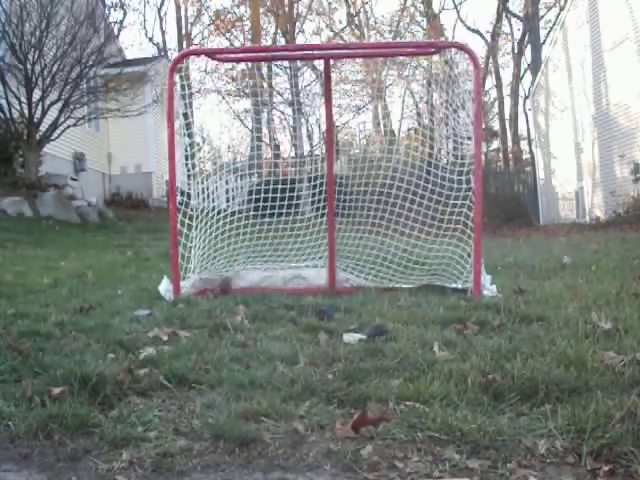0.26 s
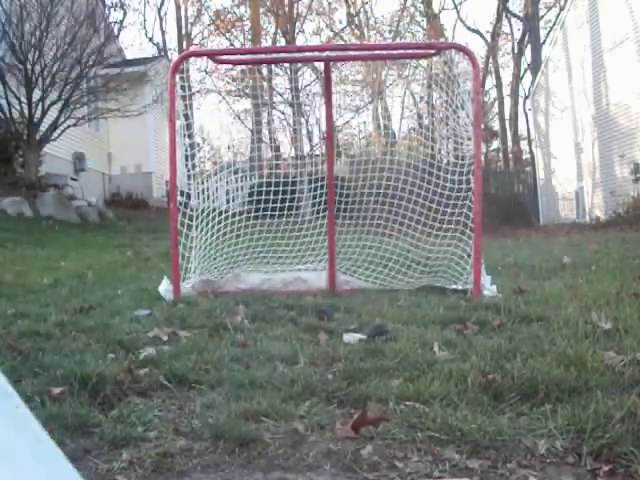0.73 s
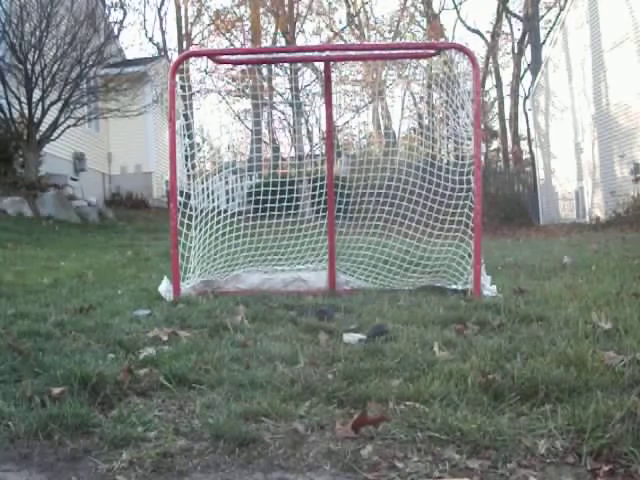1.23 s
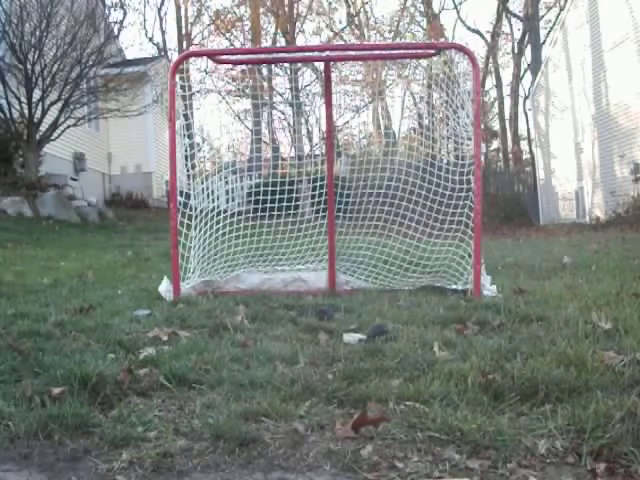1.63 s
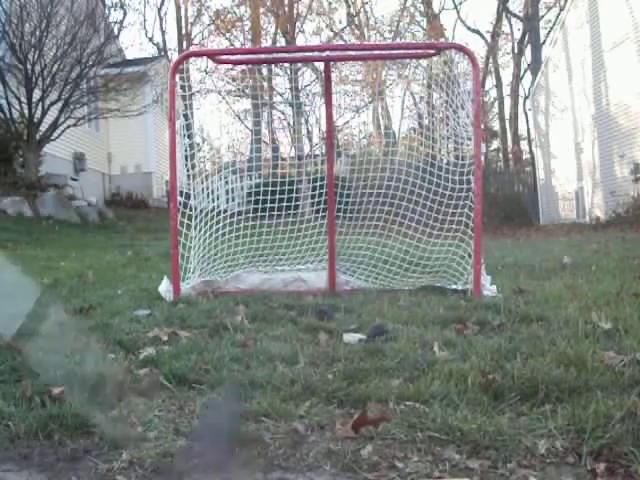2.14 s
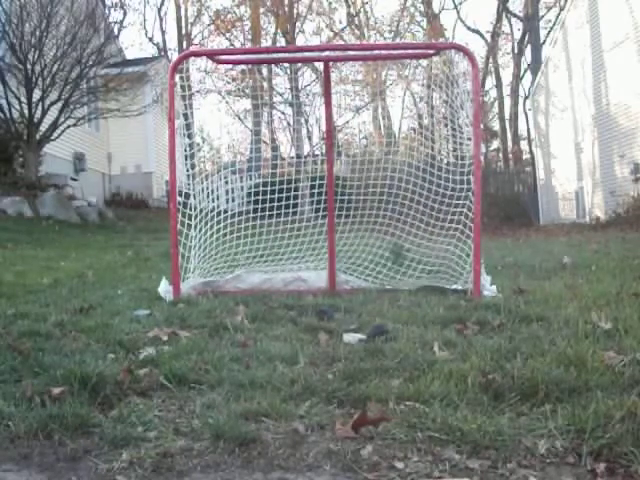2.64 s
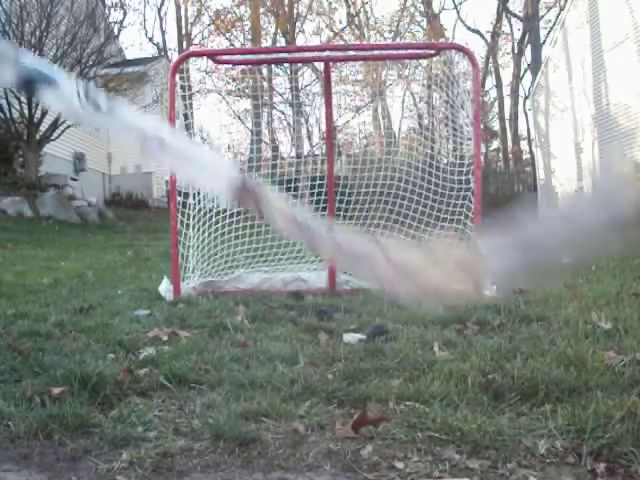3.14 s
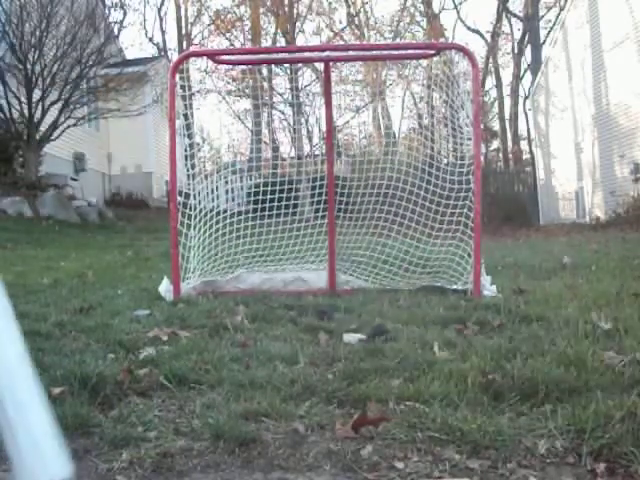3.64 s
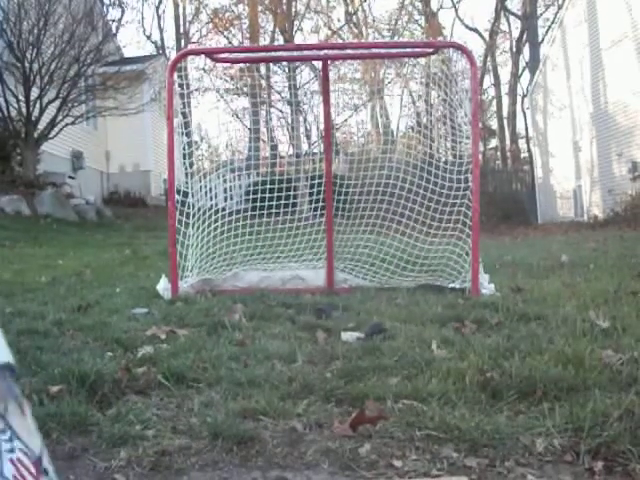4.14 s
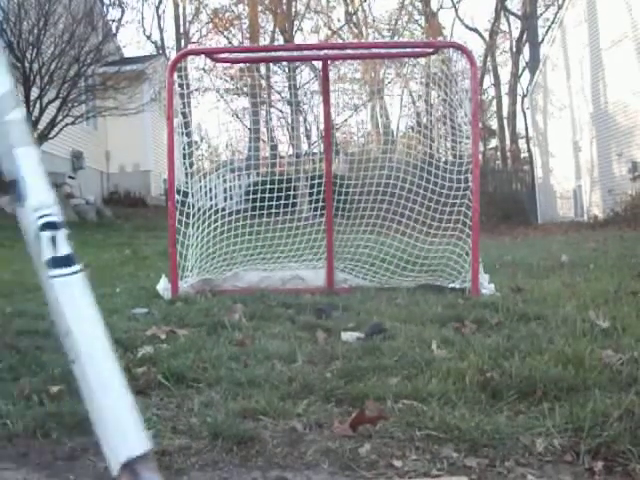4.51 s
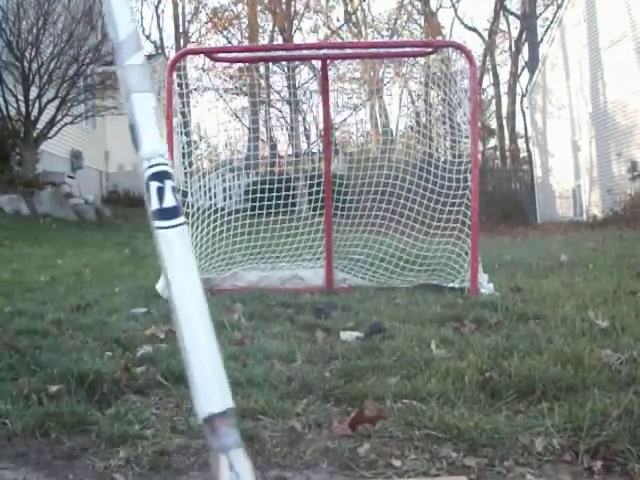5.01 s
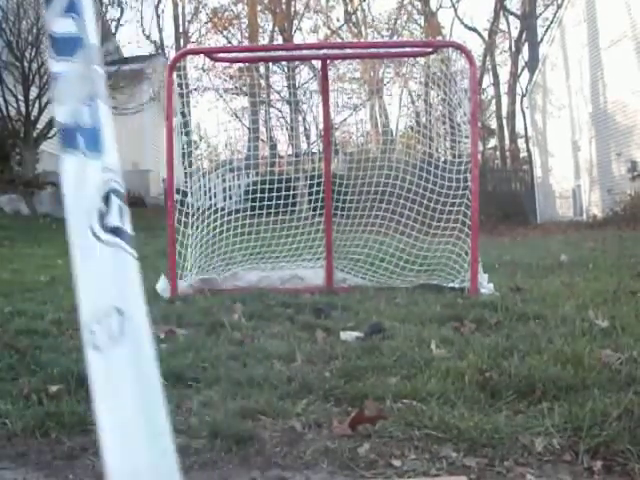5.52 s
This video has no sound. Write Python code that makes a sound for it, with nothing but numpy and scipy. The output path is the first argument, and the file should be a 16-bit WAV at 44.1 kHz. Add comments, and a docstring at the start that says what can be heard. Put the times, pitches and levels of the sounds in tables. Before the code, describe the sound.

In a quiet backyard, a hockey stick knocks and drags pucks on a board. Sharp clacks come in clusters around one and two seconds, then a near pause, a violent cracking shot just before four seconds with a short ringing shaft, and finally scattered hollow taps and scrapes. Close, dull small-camera microphone with faint hiss, whine and clipped peaks.

```python
"""A hockey stick taps, drags and shoots rubber pucks on a board laid on a lawn: each blow or rub rings shared modes.
Slaps crack, grit snaps, the shaft rings on after hard blows; low thuds and soft noisy swishes fall between.
Fences and house walls return a thin tail; light wind and far suburb hiss lie beneath, as shaped noise.
The microphone is a small camera's: dull above about 5.6 kHz, faintly whining, turned down after loud blows,
with a hard ceiling on the loudest."""
import sys
import numpy as np
from scipy import signal
from scipy.io import wavfile
from scipy.ndimage import uniform_filter1d

SR = 44100
rng = np.random.default_rng(int(sys.argv[2]) if len(sys.argv) > 2 else 0)


def generate_wav(sig):
    """Save sig (samples, or channels by samples) to the path in sys.argv[1] as 16-bit PCM at SR."""
    pcm = np.round(np.clip(np.atleast_2d(sig).T, -1, 1) * 32767).astype(np.int16)
    wavfile.write(sys.argv[1], SR, pcm)


N = 254456  # samples


def amp(db):
    """Amplitude factor of a level in dB."""
    return 10 ** (np.asarray(db) / 20)


def evened(x):
    """Scale a sound to rms 1."""
    return x / np.sqrt(np.mean(x ** 2) + 1e-20)


def read(points, hz):
    """Read a curve of (Hz, value) along a logarithmic pitch axis."""
    f, value = np.transpose(points)
    return np.interp(np.log(hz + 1), np.log(f + 1), value)


def add(mix, s, sound):
    """Lay a sound into the mix from s seconds on."""
    part = mix[round(s * SR):][:len(sound)]
    part += sound[:len(part)]


def wander(size, span):
    """Slow chance of rms 1 that changes over span samples."""
    noise = rng.standard_normal(size)
    return evened(uniform_filter1d(uniform_filter1d(noise, span), span))


def ring(hz, db, t60, size=6000):
    """Sum of dying sines; neighbours alternate in sign so the valleys stay filled."""
    t = np.arange(size) / SR
    sign = (-1.) ** np.arange(len(hz))
    decay = amp(db[:, None] - 60 * t / t60[:, None])
    return sign @ (decay * np.sin(2 * np.pi * hz[:, None] * t))


# Modes of board and blade, in four groups from low to high; blows and strokes both play them.
# Each row: pitch in Hz, t60 in seconds before damping, then relative level in dB when struck,
# under a sliding puck, under a sweep and under a drag.
MODES_BOOM = [(186, 0.16, -12, -22, -4.5, -11), (240.3, 0.22, -5, -3.5, -5.5, 23.5),
              (300.3, 0.17, -3, -1.5, -1.5, -15), (341.2, 0.16, -6.5, -4.5, -4, -2)]
MODES_KNOCK = [(463.6, 0.14, 1.5, -10, -7, 7), (521, 0.13, 1, -7, -1.5, 7), (637, 0.098, 6, 0, -1, 3),
               (692.5, 0.12, 3.5, 2, -0.5, 4), (802, 0.066, 6, -5.5, 4, 4),
               (955.6, .12, -2.5, -10.5, -6.5, -4), (1031, 0.053, 3.5, -35, 0, -2.5),
               (1122, 0.084, -0.5, -1, -6.5, -30)]
MODES_CLACK = [(1264, 0.021, 2, -2, 4.5, -5.5), (1448, 0.054, -3.5, 2.5, -19, -10.5),
               (1597, 0.039, -3.5, -3, 0, -11), (1766, 0.071, -11, 3.5, -40, -7.5),
               (1855, 0.063, -10, 7, -16.5, -12), (2045, 0.014, 4, 9.5, 3.5, -9.5),
               (2310, 0.026, -6, -3, -3, -13), (2263, 0.065, -11, -4.5, -0.5, -13.5),
               (2620, 0.0091, -6, 5.5, -4, -11), (2904, 0.035, -11, -2.5, -12, -14)]
MODES_TICK = [(3135, 0.019, 0, 7.9, -0.36, 4.5), (3540, 0.01, 4, 11.7, 4.1, 8),
              (3956, 0.011, 1.5, 3.8, -1.5, -8), (4570, 0.0063, 3, 11.6, 0.65, 1),
              (5070, 0.0033, -11.5, 8.5, 0, 8.5)]
BODY = [MODES_BOOM, MODES_KNOCK, MODES_CLACK, MODES_TICK]
# Blows on the board. Each row: start in seconds, knock level in dB before a common trim, boom in dB
# re knock, clack (brightness) in dB re knock, centre of the knock in Hz, damping factor.
BLOWS = [(0.568, -34, -34, -0.5, 476, 2.1), (0.606, -42.5, -5, -6, 685, 2.4),
         (0.705, -35.5, 11, 0, 756, 5.5), (0.884, -12, -9, -5.5, 695, 0.32),
         (0.919, -17.5, -9, -11, 781, 1.4), (1.038, -12, -17.5, -4.5, 1160, 0.76),
         (1.06, -25.5, -9, -6, 633, 1), (1.261, -22.5, -10, 1.5, 694, 0.99),
         (1.567, -24, -13, -7, 660, 1.1), (1.68, -22, -25, -3, 687, 0.5),
         (1.962, -12.5, -5, -9.5, 800, 0.94), (1.97, -13.5, -14, -27, 660, 0.69),
         (2.003, -10, -20, -9, 950, 0.78), (2.109, -10.5, -17, -6.5, 930, 1.05),
         (2.129, -13, -22, -5.5, 641, 0.81), (2.165, -16, -17, -4.5, 460, .79),
         (2.198, -17.5, -22, -33, 470, 0.72), (2.225, -25.5, -25, -31, 496, 0.77),
         (2.392, -17.5, -7.5, 5.5, 840, 2.8), (3.054, -32, -25, 0.5, 1030, 1.14),
         (3.483, -39, -30, -21, 856, 2.5), (3.623, -43.5, -25, -1, 487, 3.8),
         (3.738, -21.5, 6, 7.5, 780, 0.33), (3.772, -17, -3.5, 8, 1110, 1.37),
         (3.784, -12.5, -13.5, -3.5, 630, .64), (3.811, -15, -27, 11, 616, 0.46),
         (3.853, -15, -8, 4.5, 1100, 0.79), (3.883, -17, 0, 3.5, 452, 0.25),
         (4.155, -22.5, -1, -14, 540, 2.7), (4.55, -14.5, -12.5, -24.5, 647, 0.69),
         (4.611, -31, -11.5, -33.5, 510, 1.9), (4.776, -20, 5.5, -1, 966, 0.47),
         (4.787, -19, -1, -5.5, 575, 0.28), (4.809, -28.5, 7.5, -16, 446, 0.35),
         (4.905, -14, -13.5, -30, 684, 0.64), (5.036, -27, -12, -12.5, 466, 1.3),
         (5.269, -29.5, -16, -28, 770, 0.36), (5.326, -33, -29, -21, 643, 0.59),
         (5.354, -30.5, -3.5, -37, 662, 1), (5.589, -15.5, -21, -13, 743, 1.7),
         (5.607, -26, -30, -10.5, 634, 0.53), (5.665, -33.5, 10, -11, 625, 0.64),
         (5.714, -25, -14, -22, 543, 0.23), (5.751, -12.5, -16, -20.5, 643, 0.6)]
# How long the rattle lasts in boom, knock, clack and tick: a factor on the contact time each.
RATTLE_LASTING = [1.45, 1.35, 1.77, 2.4]
CONTACT_MS = 5.8  # decay time of the rattle before its factors
LONGER_PER_DB = 0.03  # octaves of contact time per clack dB: a bright, flat slap rattles longer
TICK_DB, TICK_PER_CLACK = -13, 1.98  # a brighter blow gains still more in the highest modes


def blow(knock_db, boom_db, clack_db, knock_hz, damping):
    """A first knock and a dying rattle ring the modes; the spot struck favours those near knock_hz."""
    t_ms = np.arange(2000) / SR * 1000
    grit = rng.standard_normal(2000)
    tick_db = TICK_DB + TICK_PER_CLACK * clack_db
    group_db = knock_db + np.array([boom_db, 0, clack_db, tick_db])
    out = 0
    for modes, db, lasting in zip(BODY, group_db, RATTLE_LASTING):
        contact_ms = max(CONTACT_MS * 2 ** (LONGER_PER_DB * clack_db) * lasting, .3)
        rattle = (1 - np.exp(-t_ms / 0.52)) * np.exp(-t_ms / contact_ms) * grit
        rattle[20] += 16.  # first contact
        hz, t60, mode_db = np.transpose(modes)[:3]
        if modes is MODES_KNOCK:
            spot_db = -14 * np.log2(hz / knock_hz) ** 2
        else:
            spot_db = 0.99 * rng.standard_normal(len(hz))
        damped_t60 = 0.42 * t60 / max(damping, .1)
        sound = signal.fftconvolve(rattle, ring(hz, mode_db + spot_db, damped_t60))
        peak = np.sqrt(abs(uniform_filter1d(sound ** 2, size=250)).max())  # loudest 6 ms, rms
        out = out + amp(db - 2.5) * sound / peak
    return out


# Puck and blade sliding on the board, one curve a stroke.
# Each row of a curve: time in seconds, knock level in dB (how hard they rub).
SLIDES = [
    [(0.97, -71), (1.014, -37), (1.032, -23)],
    [(1.07, -40.5), (1.134, -48.5), (1.188, -40.5), (1.256, -34.5)],
    [(1.28, -28.5), (1.322, -43), (1.42, -35), (1.504, -38.5), (1.558, -35), (1.654, -40.5), (1.694, -31),
     (1.858, -34.5), (1.9, -62)],
    [(1.9, -52), (1.96, -27)],
    [(2.02, -28), (2.042, -39), (2.098, -23), (2.12, -18), (2.19, -25), (2.234, -34.5), (2.3, -76)],
    [(2.405, -42), (2.453, -53), (2.521, -45.5), (2.531, -67), (2.62, -66)],
    [(3.79, -40), (3.81, -14)],
    [(3.825, -42), (3.86, -22.5), (3.89, -34), (3.93, -56), (4.04, -80)],
    [(4.165, -36), (4.189, -38), (4.201, -30), (4.267, -65)],
    [(4.8, -26), (4.816, -29), (4.878, -58), (4.9, -56)],
    [(4.925, -41.5), (4.981, -62.5), (5.039, -35), (5.071, -48), (5.267, -35.5), (5.367, -44),
     (5.45, -47.5)],
    [(5.45, -52), (5.554, -43.5), (5.575, -26), (5.62, -29), (5.652, -40.5), (5.686, -44), (5.745, -41)],
]
# One entry a stroke: 0 for a sliding puck, 1 for a sweep, 2 for a drag.
CONTACT = [1, 1, 0, 0, 1, 1, 1, 1, 2, 2, 2, 1]
# The same strokes. Each row: damping factor of the pressed blade, then boom, clack and tick levels
# in dB when the knock is at MEDIUM_DB.
STROKES = [(2.7, -42, -43, -53), (1.4, -49, -43.5, -58), (0.73, -56, -48.5, -58), (2.5, -60, -42, -51),
           (1.3, -44.5, -44.5, -56.5), (1.2, -46.5, -39, -49), (5.8, -38, -31, -49),
           (2.6, -30, -36.5, -43.5), (2.8, -40, -73, -61.5), (8, -31, -69, -59), (1.56, -45, -54.5, -62.5),
           (1.85, -47, -50, -58)]
# Share of the knock's swings in dB that boom, clack and tick follow.
FOLLOW = [0.56, 0.53, 0.29]
MEDIUM_DB = -40


def slide(rows, contact, pressure, *medium_db):
    """Rough rubber on board: dense small slips, coming in clumps, keep the modes ringing."""
    s, knock_db = np.transpose(rows)
    swings_db = np.outer(FOLLOW, knock_db - MEDIUM_DB)
    boom_db, clack_db, tick_db = swings_db + np.array(medium_db)[:, None]
    t = np.arange(s[0] - .05, s[-1], 1 / SR)  # a lead-in lets the modes fill up
    size = len(t)
    clumps = amp(0.92 * wander(SR, span=500)[:size] + 2.9 * wander(SR, span=60)[:size])
    out = 0
    for modes, db in zip(BODY, [boom_db, knock_db, clack_db, tick_db]):
        table = np.transpose(modes)
        slips = rng.standard_normal(SR)[:size] * clumps
        ringing = ring(table[0], table[3 + contact], table[1] / max(pressure, .3))
        sound = signal.fftconvolve(slips, ringing)[:size]
        out = out + amp(np.interp(t, s, db)) * evened(sound)
    to_edge = np.minimum(t - s[0], s[-1] - t)
    return t[0], out * np.clip(to_edge / 0.0031 + .5, 0, 1)  # 3.1 ms fades


def snap(peak_db, *shape):
    """A burst so short that its peak sets the level."""
    burst = swish(0, *shape)
    return amp(peak_db) * burst / abs(burst).max()


# Dense cracks of the blade slapped flat, at or near the onset of blows.
# Each row: start in seconds, peak in dB, length in ms, centre in Hz, half width in octaves.
CRACKS = [(0.8843, -5, 2.3, 2480, 0.52), (1.039, 0.4, 5.57, 1446, 0.4), (1.262, -14.5, 1.8, 1940, 0.41),
          (1.9635, -1.3, 1.8, 1440, .86), (2.3926, -.3, 4.6, 2400, 1.1), (1.999, -16.5, 2.7, 1770, 0.38),
          (3.771, -2, 6.2, 1970, 0.65), (3.8125, 2.5, 6, 2135, 1), (4.155, -21, 2.4, 1175, 0.28),
          (4.779, -18, 12, 2720, 0.42), (5.715, -21.5, 2.9, 1700, 0.19)]


def crack(peak_db, ms, hz, octaves):
    """The slap of the flat blade is a dense band of noise, a few milliseconds long."""
    return snap(peak_db, ms, hz, octaves)


# Grit under blade or puck. Each row: start in seconds, peak in dB.
TICKS = [(0.814, -35.5), (1.1336, -36), (1.5628, -29), (2.167, -27), (2.229, -36), (2.2472, -27),
         (2.2674, -40), (2.31, -27.5), (3.431, -36.5), (3.463, -35), (4.406, -42.5), (4.553, -41.5),
         (4.9028, -35.5), (5.033, -37.5)]


def grit_tick(peak_db):
    """A grain of grit snaps: one very short burst at a broad high pitch."""
    return snap(peak_db, 3.6, 2850, 1)  # ms, Hz, half width in octaves


# Modes of the shaft. Each row: pitch in Hz, relative level in dB, t60 in seconds.
SHAFT = [(296, 0, .36), (449, -9, .22), (581, -9, .33), (1044, -11, .4), (1685, -9, .55), (1890, -12, .5),
         (2579, -21, .45), (3435, -25, .35)]
# Blows that set the shaft ringing. Each row: start in seconds, level in dB.
SHAFT_BLOWS = [(3.811, -16.5), (4.776, -47)]


def shaft(db):
    """The shaft rings on after a hard blow, in long modes of its own."""
    return amp(db) * ring(*np.transpose(SHAFT), size=SR // 2)


# Low thuds, some of them the deep boom under a hard blow.
# Each row: start in seconds, level in dB before a common trim, settled pitch in Hz, t60 in seconds.
THUDS = [(0.105, -25.5, 101.5, 0.17), (0.149, -17, 93, 0.035), (2.254, -25.5, 57, 0.13),
         (2.624, -25, 113, 0.028), (2.751, -20.5, 63.5, 0.052), (3.74, -6, 238, 0.066),
         (4.778, -18, 120.5, 0.13), (4.827, -28, 198, 0.049)]


def thud(db, hz, t60):
    """A soft push: a few low cycles that sink in pitch."""
    t = np.arange(8000) / SR
    turns = hz * (t + 0.0036 * (1 - np.exp(-t / 0.00067)))
    onset = 1 - np.exp(-t / 0.00071)
    return amp(db + 1.5 - 60 * t / t60) * np.sin(2 * np.pi * turns) * onset


# Soft bursts of noise around one pitch: swishes, a breath-like swell, the ring and echo after the shot.
# Each row: start in seconds, rms in dB before the taper, length in ms, centre in Hz, half width in octaves.
SWISHES = [(0.144, -27, 31.3, 1550, 0.8), (.985, -46.5, 49, 2940, 0.34), (2.408, -42.5, 86, 2160, 0.11),
           (2.576, -40, 11.3, 1930, 0.2), (2.706, -53, 12, 2960, 0.22), (3.027, -39.5, 7.2, 1770, 0.46),
           (3.041, -37.5, 18, 1640, 0.6), (3.454, -48, 21, 3020, 0.17), (3.588, -57.5, 19.7, 2500, 1.2),
           (4.039, -48.5, 30, 3500, 0.54), (4.3, -50.5, 120, 1400, 0.31), (4.38, -43, 87, 1390, 0.27)]


def swish(db, ms, hz, octaves):
    """A short crackly burst of noise around one pitch, tapered at both ends; snaps use it too."""
    size = round(ms * SR / 1000)
    crackle = amp(1.1 * wander(9000, span=30)[:size])
    grains = rng.standard_normal(9000)[:size] * crackle
    edges_hz = np.clip(hz * 2. ** np.array([-octaves, octaves]), 50, 9000)
    band = signal.butter(2, edges_hz, "band", fs=SR)
    return amp(db) * evened(signal.lfilter(*band, grains)) * signal.windows.tukey(size, .3)


# Tail of the yard. Each row: pitch in Hz, t60 in seconds.
YARD = [(100, 0.45), (500, 1), (2000, 0.8), (5000, 0.29)]


def yard(x):
    """Fences and house walls send back a thin tail after about 12 ms, dying by band."""
    hz, t, z = signal.stft(rng.standard_normal(SR // 2), SR, nperseg=256)
    decay = amp(-60 * t / read(YARD, hz)[:, None])
    tail = signal.istft(z * decay * (t > .012), SR, nperseg=256)[1]
    return signal.fftconvolve(x, tail / np.linalg.norm(tail))[:N]


def shaped(colour, size, patchy_db):
    """Noise of a given spectrum whose level drifts in patches of time and pitch."""
    frames, hz = N // (size // 4) + 5, np.fft.rfftfreq(size, 1 / SR)
    a, b, patches = rng.standard_normal((frames, len(hz), 3)).T
    patches = uniform_filter1d(patches, size=12, axis=0)  # across pitch
    patches = evened(uniform_filter1d(patches, size=10, axis=1))  # across time
    z = (a + 1j * b) * amp(read(colour, hz)[:, None] + patchy_db * patches)
    return evened(signal.istft(z, nperseg=size, noverlap=size - size // 4)[1][:N])


# Gusts at the microphone. Each row: time in seconds, level in dB before a small random drift.
WIND = [(0.0, -49), (0.67, -46), (0.8, -46), (1.67, -48.5), (2.15, -43.5), (3.41, -49), (3.68, -46.5),
        (3.94, -40.5), (4.68, -50.5), (4.93, -40), (5.45, -47), (5.77, -45)]
# Spectrum of the wind. Each row: pitch in Hz, relative level in dB.
WIND_COLOUR = [(10, -30.5), (25, -1.5), (50, -6), (90, -9), (150, -17), (300, -27.5), (500, -71.5)]


def wind():
    """Lumpy wind on the microphone: low noise swelling and sinking with the gusts."""
    t = np.arange(N) / SR
    gusts_db = np.interp(t, *np.transpose(WIND)) + 1.5 * wander(N, span=2000)
    return amp(gusts_db) * shaped(WIND_COLOUR, size=4096, patchy_db=0.5)


# Spectrum of the far suburb. Each row: pitch in Hz, relative level in dB per Hz.
AIR = [(88, -36), (150, 1.5), (280, -7), (343, -7.5), (761, -9.5), (1160, -14), (1740, -10.5), (2010, -21),
       (3200, -19), (3980, -22.5), (4800, -26), (5600, -24), (6300, -54.5)]


def far_hiss():
    """The far suburb blends into one steady, slightly patchy noise."""
    return amp(-53) * shaped(AIR, size=1024, patchy_db=-0.56)


# Tones of the small camera. Each row: pitch in Hz, rms in dB, phase slip in radians.
WHINE = [(4915, -71, 0), (5416, -68, 2.2), (5609, -70, -2.2), (6110, -100, 0)]


def whine():
    """Steady tones; two drift in phase and snap back with every camera picture, which ticks softly."""
    t = np.arange(N) / SR
    picture = uniform_filter1d((t * 29.97 + .6) % 1, size=70)  # pictures a second; snaps back in 1.6 ms
    return sum(np.sqrt(2) * amp(db) * np.sin(2 * np.pi * hz * t + slip * picture)
               for hz, db, slip in WHINE)


def scene():
    """Stick and puck on the lawn, the yard's answer to the hits, then wind and far hiss."""
    hits, rest = np.zeros(N), np.zeros(N)
    for s, *row in BLOWS:
        add(hits, s, blow(*row))
    for s, *row in CRACKS:
        add(hits, s, crack(*row))
    for s, peak_db in TICKS:
        add(hits, s, grit_tick(peak_db))
    for rows, contact, stroke in zip(SLIDES, CONTACT, STROKES):
        add(rest, *slide(rows, contact, *stroke))
    for s, db in SHAFT_BLOWS:
        add(rest, s, shaft(db))
    for s, *row in THUDS:
        add(rest, s, thud(*row))
    for s, *row in SWISHES:
        add(rest, s, swish(*row))
    return (hits + amp(-28.5) * yard(hits) + rest + wind() + far_hiss())[None]


def low_pass(x, taps, hz):
    """Steep filter that keeps what lies below hz."""
    return signal.oaconvolve(x, signal.firwin(taps, hz, window=("kaiser", 9), fs=SR)[None], "same")


def smooth(x, samples):
    """Running mean that forgets over the given number of samples."""
    return signal.lfilter([1 / samples], [1, 1 / samples - 1], x)


def record(dry):
    """Narrow microphone band, gain that sinks after a run of loud blows, hard ceiling, band limit."""
    ceiling = .72
    narrow = low_pass(dry, 201, 5600) + whine()
    held = np.clip(narrow[0], -ceiling, ceiling)
    power_db = 10 * np.log10(smooth(held ** 2, 4400) + 1e-12)  # mean over 0.1 s
    cut_db = 12.5 * np.clip((power_db + 18) / 1.5, 0, 1)  # from -18 dB on, full at -16.5 dB
    fall = np.arange(N) * 55. / SR  # recovers at most 55 dB a second
    cut_db = np.maximum.accumulate(cut_db + fall) - fall
    cut_db = smooth(cut_db, 2200)  # the gain follows in about 50 ms
    clipped = np.clip(narrow / amp(cut_db), -ceiling, ceiling)
    return low_pass(clipped, 511, 16300)


dry = scene()
out = record(dry)
generate_wav(out)
```